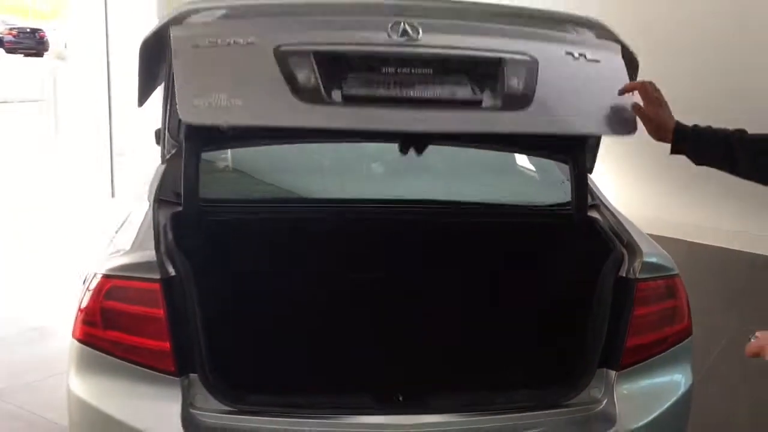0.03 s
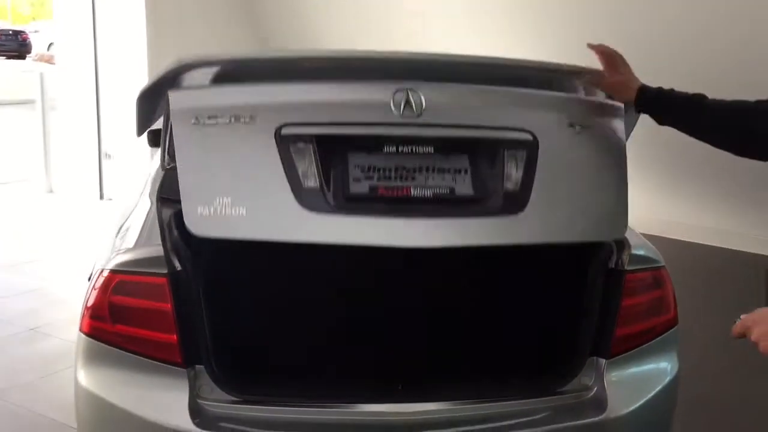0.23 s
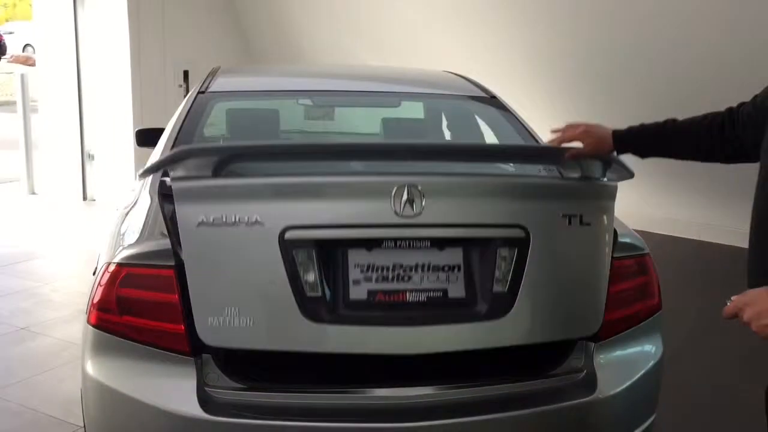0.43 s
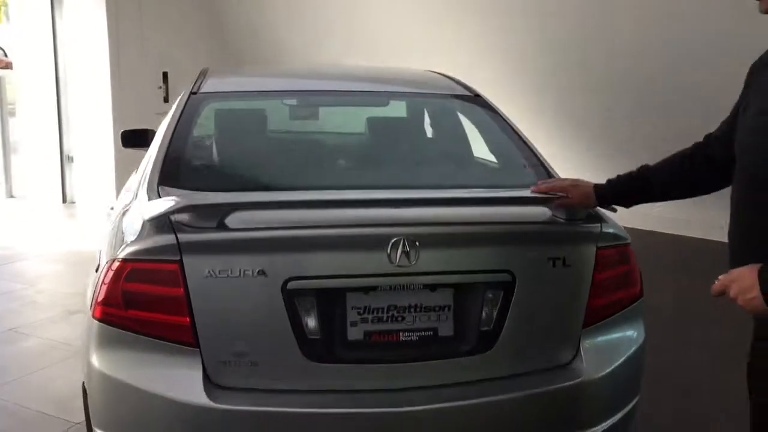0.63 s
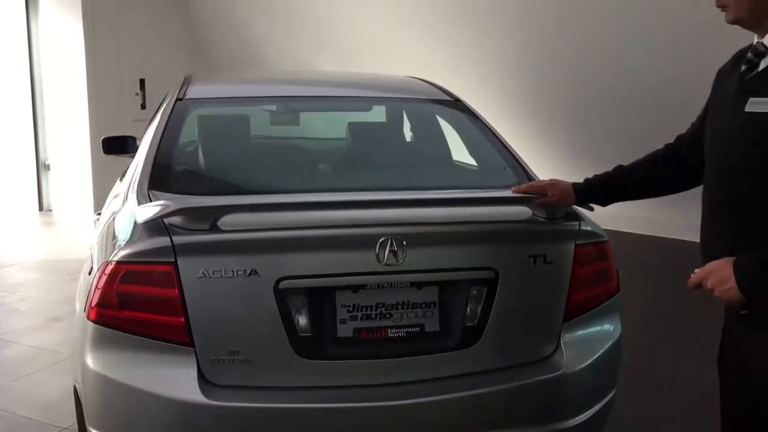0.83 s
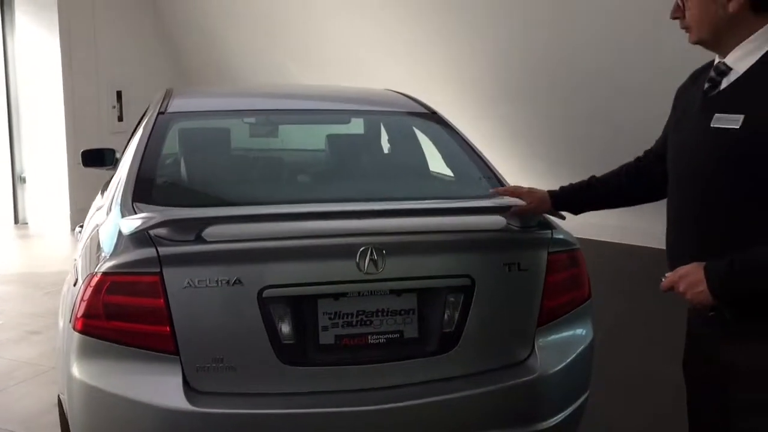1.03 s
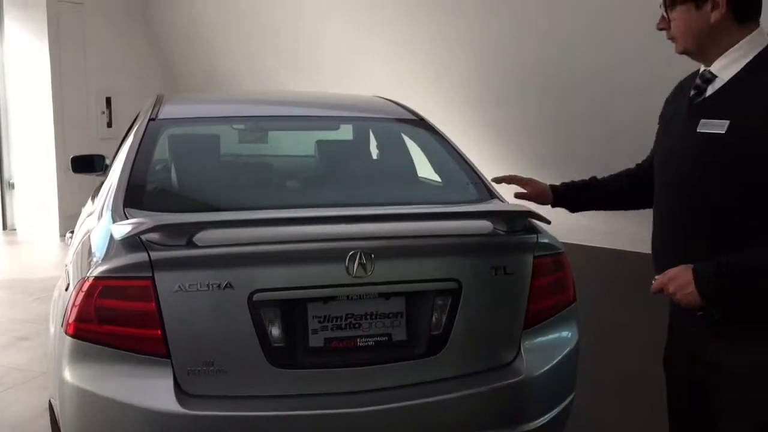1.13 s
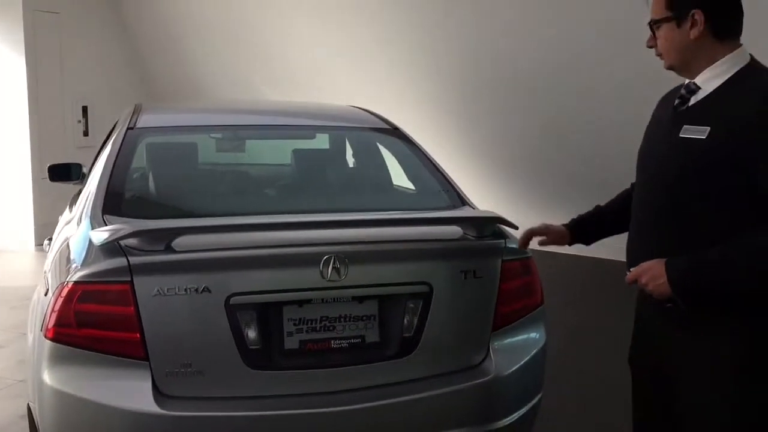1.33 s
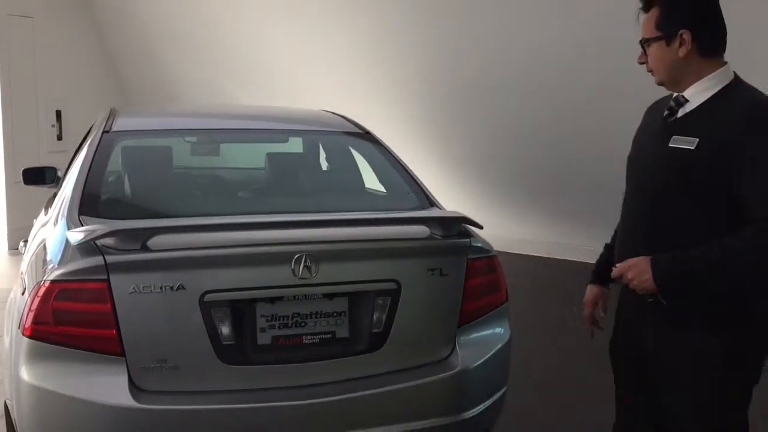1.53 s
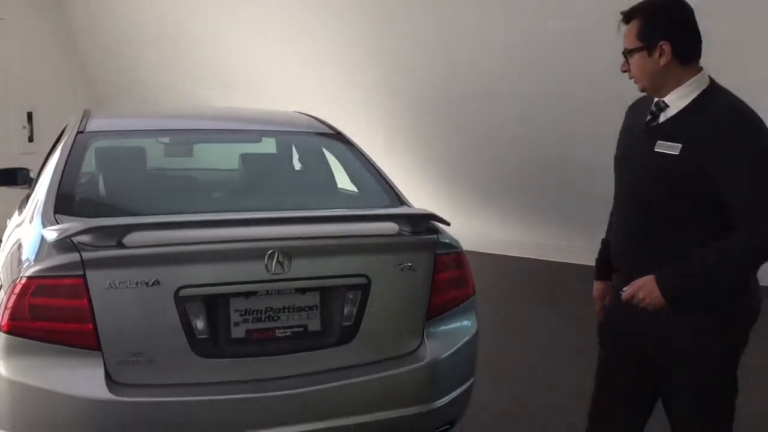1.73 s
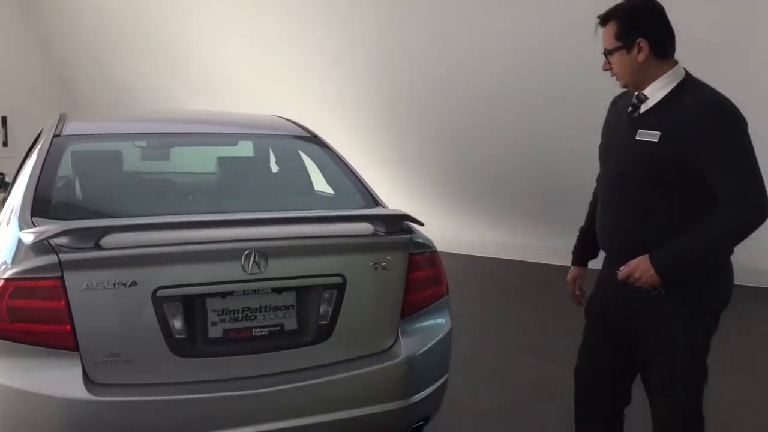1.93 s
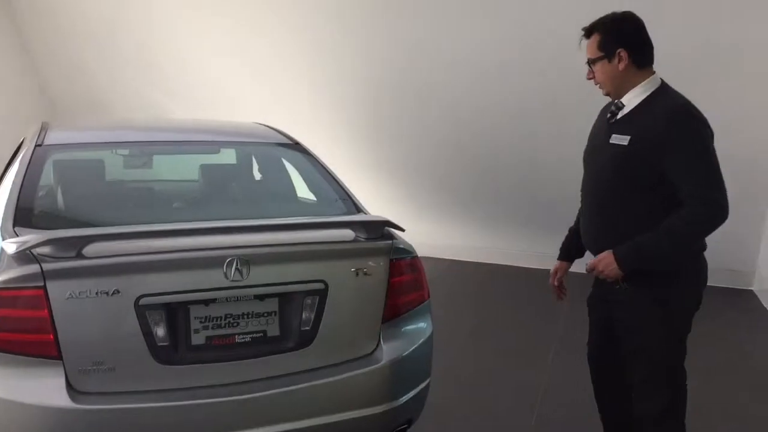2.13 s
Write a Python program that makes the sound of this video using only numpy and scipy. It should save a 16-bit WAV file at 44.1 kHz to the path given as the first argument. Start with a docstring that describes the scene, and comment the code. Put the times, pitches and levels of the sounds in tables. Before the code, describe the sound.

A car trunk lid slams shut with a boom in an echoing room.

```python
"""A car's trunk lid is pulled down and slammed in a hard-walled showroom.
The lid knocks softly on the way down. Then the latch clatters home, the steel panels ring,
the trunk booms, the car shudders on its springs, and the room echoes.
Afterwards comes a dull footfall, and a shoe scuffs and ticks. Ventilation runs throughout."""
import sys
import numpy as np
from scipy import signal
from scipy.fft import rfft, irfft
from scipy.io import wavfile

SR = 44100
rng = np.random.default_rng(int(sys.argv[2]) if len(sys.argv) > 2 else 0)


def int16_out(signal):
    """Quantize to a 16-bit WAV file."""
    q = np.round(np.clip(np.atleast_2d(signal).T, -1, 1) * 32767)
    wavfile.write(sys.argv[1], SR, q.astype(np.int16))


N = 96138

# A colour says how strong low and high pitches are. fade_s is the time to fade by 60 dB.
# Rushing air from the vents: pitch_hz, level_db
AIR_COLOUR = [(25, -17), (50, -6.5), (100, -1), (200, -6), (300, -14.5), (420, -24), (600, -15),
              (850, -7.5), (1200, -10), (1900, -16), (2600, -27.5), (4000, -38.5), (7000, -45),
              (16000, -51.5)]
# Loudness of the air duct's low drone: time_s, level_db
DUCT_LEVEL = [(0, -51.5), (.6, -52), (1.03, -51), (1.16, -43.5), (1.35, -44), (1.55, -50), (1.75, -45),
              (2.18, -46.5)]
# Loudness of a distant wash of noise: time_s, level_db
WASH_LEVEL = [(0, -71), (1.3, -73), (1.55, -49.5), (1.8, -51), (2.18, -61)]
# Colour of that wash: pitch_hz, level_db
WASH_COLOUR = [(120, -1), (220, 4), (300, 3.5), (430, -16), (900, -4), (1600, 4.5), (2100, -0.5),
               (2800, -20), (8000, -35.5)]
# How long the room echoes: pitch_hz, fade_s
ROOM_FADE = [(60, 0.76), (300, 1.33), (600, 0.69), (1000, 0.95), (2500, 0.92), (5000, 0.68), (8000, 0.57),
             (15000, 0.1)]
# Strength of the echo: pitch_hz, level_db
ROOM_COLOUR = [(60, -7.5), (300, -3), (1000, -2.5), (3000, -2), (6000, -0.5), (15000, -5.5)]
# Thud of a foot as the weight shifts: pitch_hz, level_db, fade_s
FOOTFALL_TONES = [(64, -34, 0.16), (92, -31.5, 0.13)]
# A sole rubbing the floor: pitch_hz, level_db
SCUFF_COLOUR = [(300, -8), (1200, 2), (2500, -3.5), (4500, -4.5), (7000, -10.5), (15000, -15.5)]
# The sole ticking on the floor: start_s, level_db, fade_s, treble_db
SOLE_TICKS = [(1.8228, -36.5, 0.0047, 6), (1.8252, -33, 0.0064, 0), (1.829, -43, .012, 4),
              (1.836, -49, .015, 4)]
# Colour of those ticks: pitch_hz, level_db
TICK_COLOUR = [(1000, 1), (3000, -14), (6000, -5), (15000, -2)]
# The rubbing hinge: pitch_hz, level_db
HINGE_COLOUR = [(150, 6), (290, 13), (500, 4), (1500, -4), (3000, -13.5), (8000, -23), (16000, -26)]
# Knocks of the swinging lid: start_s, gain_db, pitch_ratio
LID_KNOCKS = [(0.399, -18.5, 1.02), (.44, -19, 1.17), (0.467, -2, 0.97), (.54, -13, 1.106),
              (0.628, -19.5, 0.82)]
# What each knock rings with: pitch_hz, level_db, fade_s
KNOCK_TONES = [(231, -38, .12), (296.6, -17.5, 0.1), (348, -34, 0.29)]
# The car shaking on its springs: pitch_hz, level_db
SHUDDER_COLOUR = [(30, -28), (55, -5.5), (100, -4), (165, -1), (260, -3), (400, -11.5), (800, -17.5),
                  (2000, -17.5), (8000, -46.5)]
# Boom of the car body and hollow trunk: pitch_hz, level_db, fade_s
BODY_TONES = [(49.3, -18, 0.79), (62.7, -20, 0.57), (84.8, -10.5, 0.56), (114.1, -12.5, 0.55),
              (131.2, -16.5, 0.5)]
# Ringing of the broad steel skin: pitch_hz, level_db, fade_s
SKIN_TONES = [(200.5, -13.5, .36), (239.6, -8, 0.26), (298.4, -4.5, 0.25), (339.6, -18, 0.32),
              (357, -16, 0.14), (438, -19, 0.17)]
# Ringing of the latch plate and lid frame: pitch_hz, level_db, fade_s
FRAME_TONES = [(511, -23.5, 0.12), (615, -30, 0.69), (655, -15, 0.18), (877.5, -13.5, 0.2),
               (926, -26, 0.17), (1231, -15, .15), (1279, -24, 0.21), (1349, -32.5, 0.48),
               (1691, -18, 0.17), (1876, -25, 0.089), (2470, -21, 0.26), (2854, -22.5, 0.096),
               (3080, -25, 0.11), (3680, -28, 0.17)]
# Metal hitting metal as the latch catches: start_s, level_db, fade_s, treble_db
LATCH_HITS = [(0.6638, -18.5, 0.045, -5), (0.6688, -13.5, 0.07, 3.5), (0.6763, -14, 0.074, -2),
              (0.683, -16.5, 0.1, 5), (0.691, -10.5, 0.082, -3.5), (0.7203, -23, 0.088, 5),
              (0.7681, -20.5, .025, 4.5)]
# Colour of those hits: pitch_hz, level_db
CLATTER_COLOUR = [(100, 0.5), (400, 5), (900, 0.5), (1500, -1), (2800, -4), (4000, -7.5), (5000, -15),
                  (7500, -19), (12000, -20), (16000, -22.5)]

BODY_S, LATCH_S, SEAL_S = 0.6665, 0.6688, 0.686  # when the lid strikes each part


def from_db(db):
    """Turn decibels into a number to multiply by."""
    return 10 ** (np.asarray(db) / 20)


def since(start_s):
    """Seconds since a moment, zero before it."""
    return np.maximum(np.arange(N) / SR - start_s, 0)


def level_curve(rows):
    """Loudness that slides from point to point."""
    return from_db(np.interp(since(0), *np.transpose(rows)))


def at_hz(rows, hz):
    """Look up a pitch in a table, with octaves evenly spaced."""
    pitches, values = np.transpose(rows)
    return np.interp(np.log(np.maximum(hz, 1)), np.log(pitches), values)


def fade(t, fade_s):
    """Fall by 60 dB every fade_s seconds."""
    return from_db(-60 * t / fade_s)


def shaped_noise(gain_at):
    """Steady noise of strength 1, with a gain for each pitch."""
    spectrum = rfft(rng.standard_normal(N))
    x = irfft(spectrum * gain_at(np.fft.rfftfreq(N, 1 / SR)), N)
    return x / x.std()


def noise(colour):
    """Steady noise in a given colour."""
    return shaped_noise(lambda hz: from_db(at_hz(colour, hz)))


def wobble(width_hz, centre_hz=0):
    """Random wavering, mostly within width_hz of the centre."""
    return shaped_noise(lambda hz: 1 / (1 + ((hz - centre_hz) / width_hz) ** 2))


def ring(tones, start_s, rise_s, pitch_ratio=1):
    """A struck part's tones swell quickly, then each fades at its own rate."""
    t = since(start_s)
    swell = 1 - np.exp(-t / rise_s)
    return swell * sum(
        (-1) ** k * from_db(db) * fade(t, fade_s) * np.sin(2 * np.pi * pitch_ratio * hz * t)
        for k, (hz, db, fade_s) in enumerate(tones))


def bursts(hits, colour, treble_hz=4000):
    """Each hit starts a short burst of noise with its own amount of treble."""
    rattle = noise(colour)
    low = signal.sosfilt(signal.butter(1, treble_hz, fs=SR, output="sos"), rattle)
    low_power, high_power = 0, 0
    for start_s, db, fade_s, treble_db in hits:
        t = since(start_s)
        loudness = from_db(db) * (t > 0) * fade(t, fade_s)
        low_power += loudness ** 2
        high_power += (from_db(treble_db) * loudness) ** 2
    return np.sqrt(low_power) * low + np.sqrt(high_power) * (rattle - low)


def rub(colour, start_s, rise_s, hold_s, fade_s, grain_db):
    """Grainy noise that rises, holds and fades."""
    grain = from_db(grain_db * wobble(200))
    rise = np.minimum(since(start_s) / rise_s, 1)
    fall = fade(since(start_s + rise_s + hold_s), fade_s)
    return rise * fall * grain * noise(colour)


def ventilation():
    """Steady air, a duct droning around the fan's wavering hum, and a distant wash."""
    waver = from_db(0.07 * wobble(10))
    drone = wobble(16.2, centre_hz=144.7)
    fan_hz = 143.5 + 6.12 * wobble(10)
    drone += from_db(-4.5) * np.sqrt(2) * np.sin(2 * np.pi * np.cumsum(fan_hz) / SR)
    air = from_db(-46) * waver * noise(AIR_COLOUR)
    duct = level_curve(DUCT_LEVEL) * drone / drone.std()
    wash = level_curve(WASH_LEVEL) * noise(WASH_COLOUR)
    return air + duct + wash


def showroom(sound, gap_s=0.01, build_s=0.0048):
    """Echoes off the hard walls build up after a short gap; the treble dies first."""
    hz, t = np.fft.rfftfreq(N, 1 / SR), since(gap_s)
    centres = np.geomspace(40, 16000, 18)
    white, tail = rfft(rng.standard_normal(N)), 0
    for centre, share in zip(centres, np.eye(len(centres))):
        band = irfft(white * at_hz(np.c_[centres, share], hz), N)  # noise near this pitch
        shape = fade(t, at_hz(ROOM_FADE, centre)) * (1 - np.exp(-t / build_s))
        tail += band * from_db(at_hz(ROOM_COLOUR, centre)) * shape / np.linalg.norm(shape)
    return signal.fftconvolve(sound, tail)[:N]


def footsteps():
    """A foot thuds down, then a sole scuffs and ticks on the floor."""
    thud = ring(FOOTFALL_TONES, start_s=1.066, rise_s=0.0069)
    scuff = rub(SCUFF_COLOUR, start_s=1.686, rise_s=0.028, hold_s=0.04, fade_s=0.33, grain_db=1.7)
    return thud + from_db(-49) * scuff + bursts(SOLE_TICKS, TICK_COLOUR)


def lid_swing():
    """The hinge rubs and the lid knocks softly on its way down."""
    hinge = rub(HINGE_COLOUR, start_s=0.378, rise_s=0.03, hold_s=0.06, fade_s=0.25, grain_db=2.2)
    knocks = sum(from_db(db) * ring(KNOCK_TONES, start_s, rise_s=0.0036, pitch_ratio=ratio)
                 for start_s, db, ratio in LID_KNOCKS)
    return from_db(-46) * hinge + knocks


def car_shudder():
    """The whole rear of the car shakes on its springs."""
    rumble = rub(SHUDDER_COLOUR, LATCH_S, rise_s=0.015, hold_s=0.115, fade_s=0.15, grain_db=3)
    return from_db(-22) * rumble


def trunk_boom():
    """The body and hollow trunk boom; the steel skin shakes as the lid lands on its seal."""
    return ring(BODY_TONES, BODY_S, rise_s=0.016) + ring(SKIN_TONES, SEAL_S, rise_s=0.016)


def frame_ring():
    """The blow sets the latch plate and lid frame ringing."""
    return ring(FRAME_TONES, LATCH_S, rise_s=0.0031)


def latch_clatter():
    """Metal parts hit each other in quick succession as the latch catches."""
    return bursts(LATCH_HITS, CLATTER_COLOUR)


def scene():
    """The slam, the swing and the steps echo in the room, over the ventilation."""
    # sound, echo_db (how strongly it feeds the echo)
    layers = [(latch_clatter(), -2.5), (frame_ring(), -8), (trunk_boom(), -16.5),
              (car_shudder(), -4.5), (lid_swing() + footsteps(), -7.5)]
    direct = sum(sound for sound, _ in layers)
    into_room = sum(from_db(echo_db) * sound for sound, echo_db in layers)
    return (direct + showroom(into_room) + ventilation())[None]


def record(dry, ceiling=2.3, cutoff_hz=15900):
    """Round off the tallest peaks and cut the very highest treble."""
    rounded = dry / (1 + (dry / ceiling) ** 4) ** (1 / 4)
    return signal.sosfilt(signal.ellip(10, 0.1, 80, cutoff_hz, fs=SR, output="sos"), rounded)


dry = scene()
out = record(dry)
int16_out(out)
```